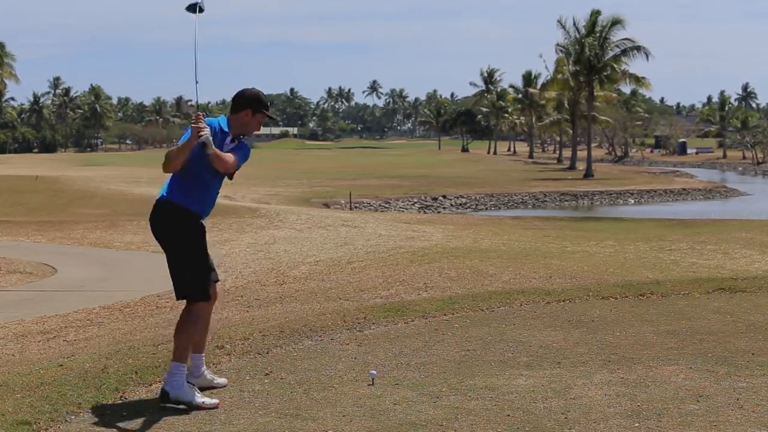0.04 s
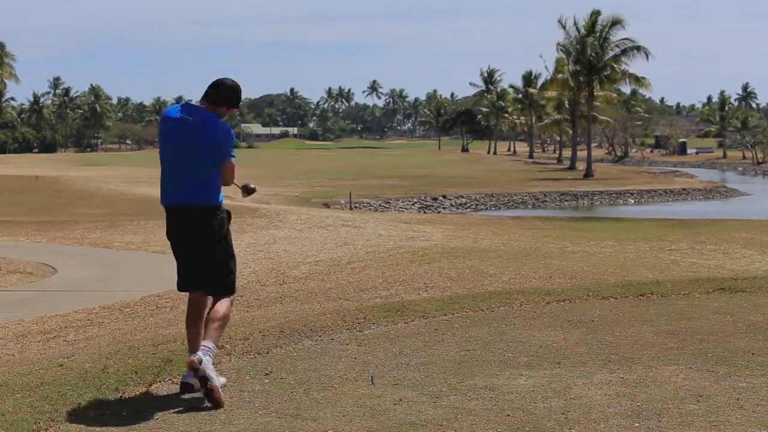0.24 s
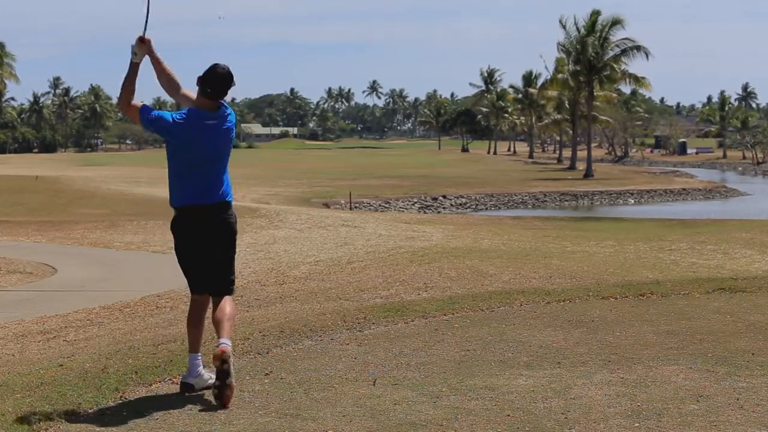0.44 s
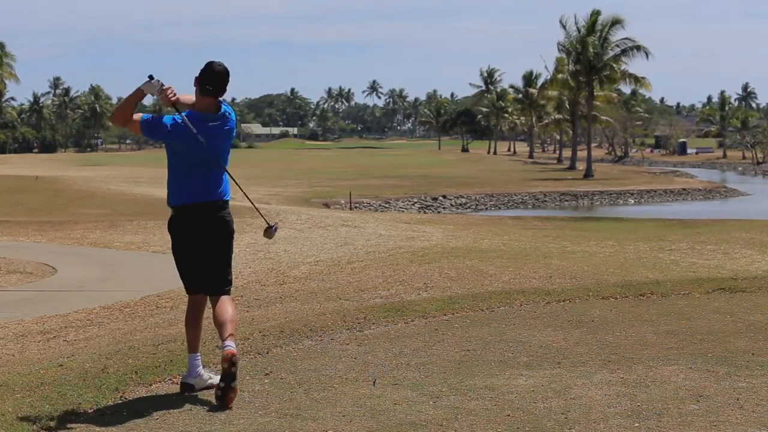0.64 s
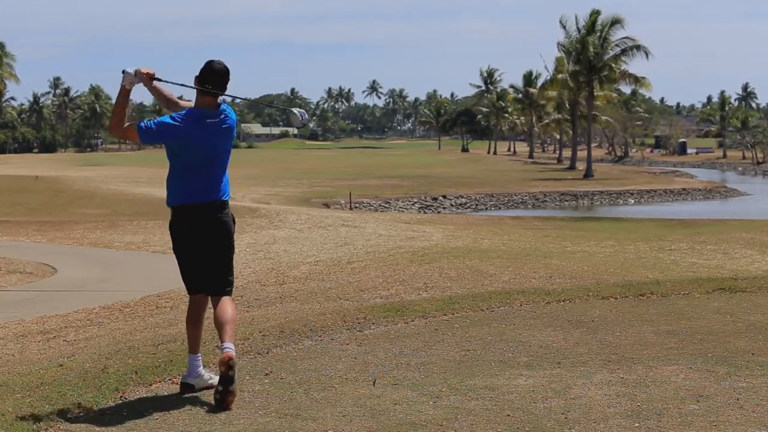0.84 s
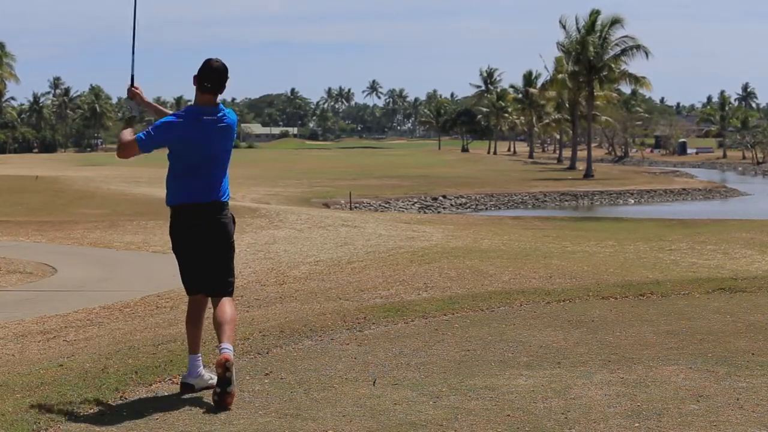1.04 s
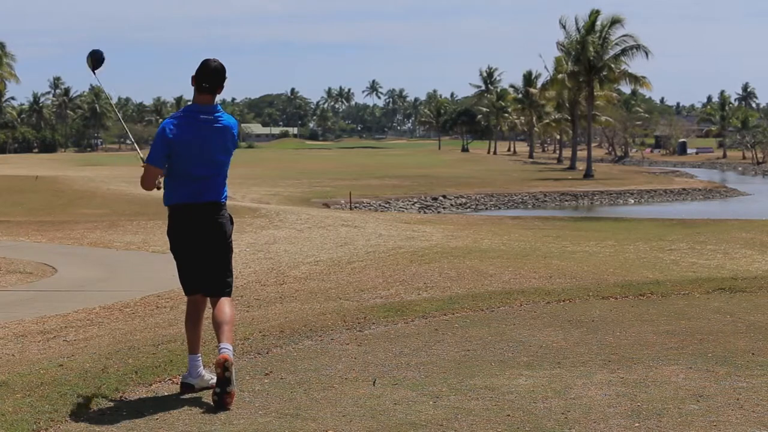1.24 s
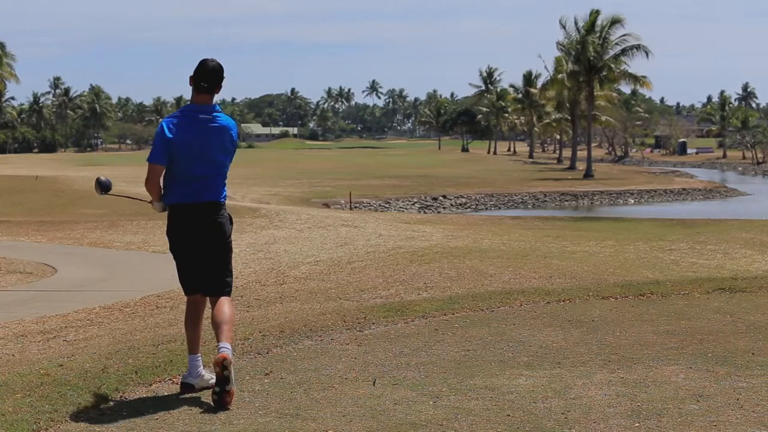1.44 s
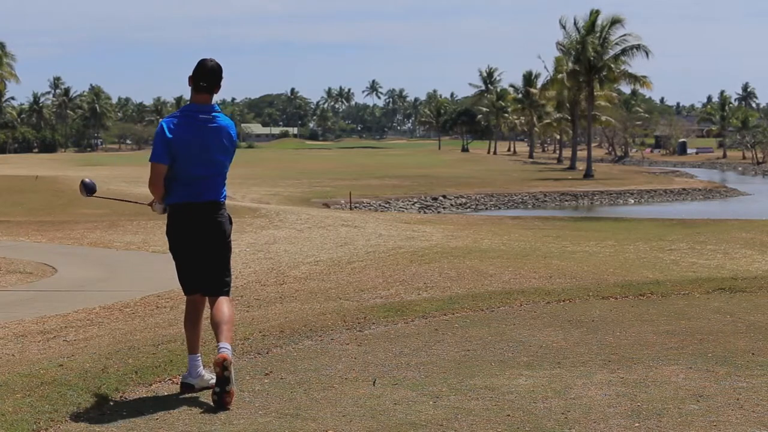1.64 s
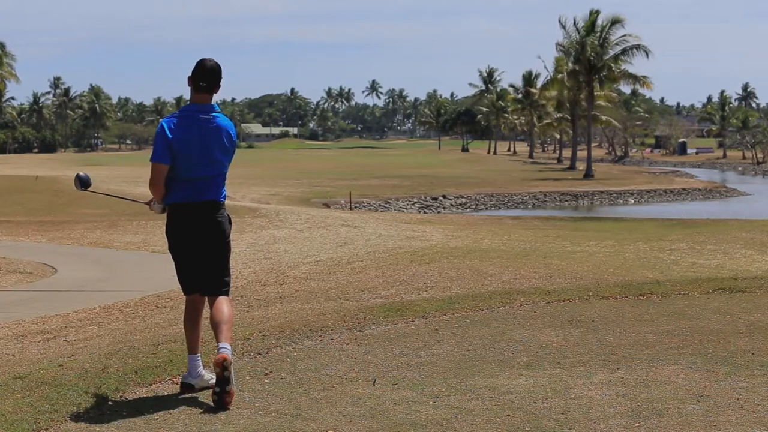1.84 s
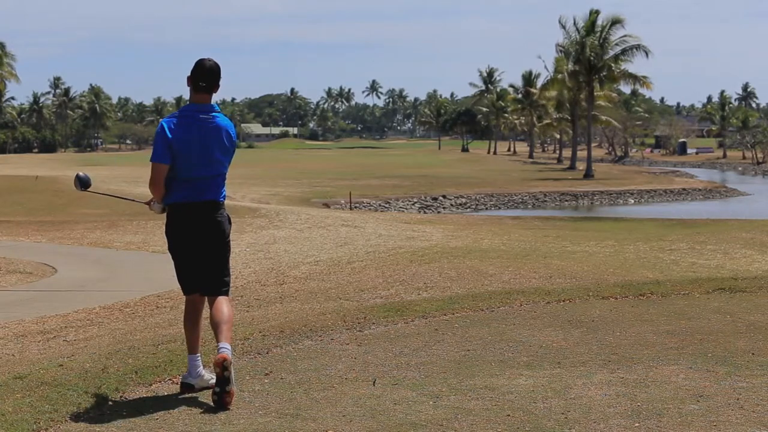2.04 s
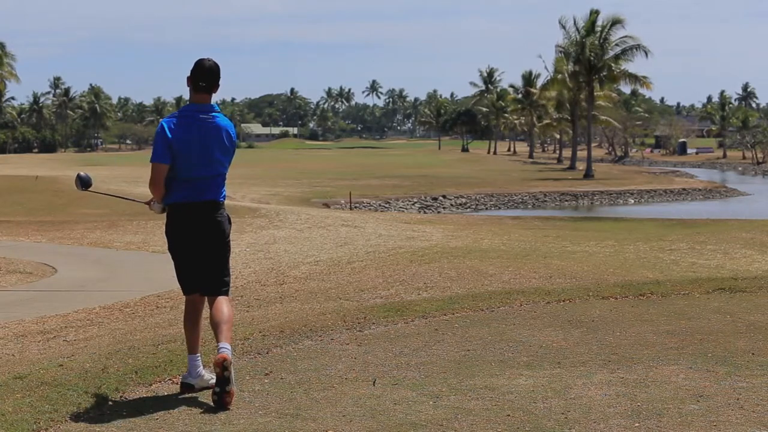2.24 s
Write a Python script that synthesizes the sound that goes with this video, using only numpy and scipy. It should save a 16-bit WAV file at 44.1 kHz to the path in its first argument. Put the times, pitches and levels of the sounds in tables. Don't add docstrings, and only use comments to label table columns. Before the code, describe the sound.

A golf driver hits a teed ball: a brief rising swish, a loud sharp metallic crack with a short high ring, faint scattered echo from trees, a fading hiss, then soft breeze, heard from a few metres away.

```python
import sys
import numpy as np
from scipy import signal
from scipy.fft import rfft, irfft, next_fast_len
from scipy.io import wavfile
from scipy.ndimage import uniform_filter1d, map_coordinates

SR = 44100
rng = np.random.default_rng(int(sys.argv[2]) if len(sys.argv) > 2 else 0)


def store_pcm(level_fs):
    pcm = np.round(np.clip(level_fs, -1, 1) * 32767).astype(np.int16)
    wavfile.write(sys.argv[1], SR, np.atleast_2d(pcm).T)


def nominal_scale(level):
    x = np.asarray(level, float) / 20
    return 10 ** x


N = 101429

HIT_S, HIT_DB = 0.2575, -16


def unit(x):
    return x / np.sqrt(np.mean(x ** 2) + 1e-20)


def clock():
    return np.arange(N) / SR


def since(start_s):
    return np.maximum(clock() - start_s, 0)


def curves(rows):
    s, *columns = np.transpose(rows)
    return [np.interp(clock(), s, column) for column in columns]


def wobble(rate_hz):
    points = rng.standard_normal(int(N * rate_hz / SR) + 4)
    return map_coordinates(points, [np.arange(N) * rate_hz / SR])


def rush(spectrum, patchy_db):
    _, _, z = signal.stft(rng.standard_normal(N + 512), SR, nperseg=512)
    patches = uniform_filter1d(rng.standard_normal(z.shape), 6, 0)
    patches = unit(uniform_filter1d(patches, 10, 1))
    noise = signal.istft(z * nominal_scale(patchy_db * patches), nperseg=512)[1][:N]
    hz, db = np.transpose(spectrum)
    m = next_fast_len(N)
    log_hz = np.log(np.fft.rfftfreq(m, 1 / SR) + 1)
    gain = nominal_scale(np.interp(log_hz, np.log(hz + 1), db, -120, -120))
    return unit(irfft(rfft(noise, m) * gain, m)[:N])


def fuzzy(hz, width_hz):
    phase = 2 * np.pi * np.cumsum(hz * np.ones(N)) / SR
    return unit(wobble(width_hz) * np.cos(phase) + wobble(width_hz) * np.sin(phase))


def course():
    # t/s, level/dB
    breeze = [(0, 2.5), (.5, 2), (1, 0.5), (1.5, -0.37), (2, -0.26), (2.3, -0.2)]
    # f/Hz, level/dB
    air_colour = [(180, -40), (300, -4.5), (316, -5.5), (497, -4), (571, -4.5), (914, -2.5), (2400, -14.5),
                  (3120, -53), (5280, -120)]
    hiss_colour = [(1350, -27), (2300, -2.5), (3300, -1), (3730, -3.5), (4070, -5), (5480, -12.5),
                   (14400, -26), (15700, -30)]
    rumble_colour = [(12, -36), (20, -14), (70, 1), (177, -5), (204, -8.5), (235, -4), (264, -10),
                     (330, -17), (430, -50), (730, -120)]
    # t/s, level/dB
    insect_path = [(0, -78), (.6, -69), (.7, -65.5), (.88, -70), (1.1, -75), (1.5, -78), (1.7, -73),
                   (1.9, -86), (2.3, -85)]
    db, = curves(breeze)
    air = nominal_scale(-57.5) * rush(air_colour, patchy_db=1.1) + nominal_scale(-64.5) * rush(hiss_colour, patchy_db=0.56)
    gusts = nominal_scale(db + 0.52 * wobble(2.97) + 0.77 * wobble(30.1))
    rumble = nominal_scale(-53 + 0.8 * db + 0.68 * wobble(6)) * rush(rumble_colour, patchy_db=1.3)
    insects = nominal_scale(curves(insect_path)[0]) * fuzzy(3180, width_hz=450)
    hum = nominal_scale(-66) * fuzzy(238, width_hz=25)
    return gusts * air + rumble + insects + hum


def swing():
    # t/s, f/Hz, level/dB
    shaft_path = [
        (.13, 380, -67),
        (.165, 520.6, -56.5),
        (.19, 618.6, -49.5),
        (.224, 560, -41.5),
        (.255, 601.6, -37.5),
        (.272, 498.6, -44),
        (.335, 449.7, -52.5),
        (.39, 351, -56.5),
        (.48, 250, -57),
    ]
    # t/s, f/Hz
    head_path = [(.17, 615), (.2, 774), (.225, 872.4), (.26, 856)]
    # f/Hz, level/dB
    swish_colour = [(760, -27), (1300, -5.5), (1620, -3), (2600, -3), (8230, -18.5), (15500, -37)]
    width_hz = 260
    swish_db, swish_growth = -4.5, 1.3
    hz, db = curves(shaft_path)
    alive = (clock() > shaft_path[0][0]) & (clock() < shaft_path[-1][0])
    shaft = fuzzy(hz, width_hz)
    head = nominal_scale(-0.5) * fuzzy(*curves(head_path), width_hz * 0.9) * (clock() < HIT_S + 0.004)
    hiss_db = db.max() + swish_db + swish_growth * (db - db.max())
    hiss = nominal_scale(hiss_db) * rush(swish_colour, patchy_db=-1.0) * (clock() < HIT_S + 0.01)
    return alive * nominal_scale(db) * (shaft + head) + hiss


def ringing(t, shift):
    # f/Hz, level/dB, time to fall 60 dB/s, rise/s
    modes = [(2985, -13.5, 0.16, 0.00021), (3744, -10, 0.098, 0.00024), (4060, -6.5, 0.1, 0.0052),
             (4324, -1, .09, .0012), (3197, 0, 0.0079, 0.00014), (5540, -15.5, 0.081, 0.0023),
             (6080, -11, .06, .003), (6420, -4.5, .075, 0.0041), (7100, -11.5, 0.074, .002),
             (7730, -14, .05, .002), (8160, -15, .07, .003), (8600, -16.5, .07, 0.0033),
             (9320, -12, 0.033, 0.00037), (10650, -20, 0.039, .001)]
    sag, sag_s, unrest_rad = 0.022, 0.01, 0.35
    bent = shift * (t - sag * (t - sag_s * (1 - np.exp(-t / sag_s))))
    ring = 0
    for hz, db, t60, rise in modes:
        envelope = nominal_scale(db - 60 * t / t60) * (1 - np.exp(-t / rise))
        phase = 2 * np.pi * hz * bent + unrest_rad * wobble(247)[:len(t)]
        ring = ring + envelope * np.sin(phase)
    return ring


def strike():
    # f/Hz, level/dB
    crack_colour = [(200, -30), (500, -6), (2300, 1), (5000, -10), (7500, -2.5), (10500, -10.5),
                    (12500, -10.5), (15700, -18)]
    # f/Hz, level/dB
    rattle_colour = [(3000, -35), (4500, -7), (7000, 2), (9500, -4), (11500, -18.5), (15700, -29)]
    contact_s, rise_s = 0.00074, 0.00017
    turf_s, turf_db = 0.0023, -2.5
    t = since(HIT_S)
    push = -nominal_scale(-16.5) * np.sin(np.pi * np.clip((t - 0.0003) / contact_s, 0, 1)) ** 2
    crack = nominal_scale(-23.5 - 60 * t / 0.019) * rush(crack_colour, patchy_db=0.5)
    rattle = nominal_scale(-29 - 60 * t / 0.13) * rush(rattle_colour, patchy_db=1.0)
    direct = nominal_scale(HIT_DB) * ringing(t, 0.99) + (crack + rattle) * (1 - np.exp(-t / rise_s))
    turf = nominal_scale(turf_db) * np.pad(0.34 * direct - 0.53 * push, (round(turf_s * SR), 0))[:N]
    return direct + push + turf


def thump():
    t = since(HIT_S)
    u = t / 0.012
    sway = np.sin(2 * np.pi * 38 * t + 1.1) * np.minimum(t / 0.004, 1)
    settling = np.exp(-u) * (1 + u + u * u / 2)
    ending = nominal_scale(-60 * np.maximum(t - 0.019, 0) / 0.03)
    return nominal_scale(-34) * sway * settling * ending


def ball():
    # t/s, level/dB
    flight = [
        (.27, -66),
        (.305, -62),
        (.33, -47),
        (.39, -51),
        (.43, -52.5),
        (.465, -54.5),
        (.53, -66.5),
        (.6, -66),
        (.75, -78.5),
    ]
    # f/Hz, level/dB
    ball_colour = [(1000, -14), (2900, -6), (4900, -9), (6500, -6), (9600, -10.5), (11000, -18.5),
                   (15700, -27)]
    db, = curves(flight)
    alive = (clock() > flight[0][0]) * nominal_scale(-40 * since(flight[-1][0]))
    return alive * nominal_scale(db + 0.7 * wobble(90)) * rush(ball_colour, patchy_db=1.5)


def trees():
    # pitch ratio, level/dB
    directions = [(.94, 0), (.98, -3), (1.025, -1)]
    echo_s, echo_db, echo_t60, echo_end_s = 0.066, -18.5, 0.87, 0.19
    toward = 1.065
    late = clock() - HIT_S - echo_s
    t = np.arange(SR // 20) / SR
    last_crown = 1 + np.exp(np.clip((echo_end_s - late) / 0.013, -50, 50))
    fade_db = -60 * np.abs(late) / echo_t60 - 12 / last_crown
    echo = 0
    for shift, db in directions:
        crowns = rng.standard_normal(N) * nominal_scale(6.2 * wobble(69.9) + fade_db) * (late > 0)
        crowns = crowns / np.linalg.norm(crowns)
        short_ring = ringing(t, shift * toward) * nominal_scale(-60 * t / 0.1)
        echo = echo + nominal_scale(db) * signal.fftconvolve(crowns, short_ring)[:N]
    leaves = signal.butter(2, [3700, 4800], "band", fs=SR, output="sos")
    return nominal_scale(HIT_DB + echo_db) * signal.sosfilt(leaves, echo)


def shoe():
    # f/Hz, level/dB
    shoe_colour = [(60, -22), (120, 0), (300, 2), (500, -14), (1500, -23), (2200, -31)]
    t = since(0.432)
    return nominal_scale(-47.5 - 60 * t / 0.11) * (1 - np.exp(-t / 0.004)) * rush(shoe_colour, patchy_db=3.0)


def scene():
    return (course() + swing() + strike() + ball() + trees() + shoe())[None]


def low_pass(x):
    return signal.sosfilt(signal.butter(12, 16450, fs=SR, output="sos"), x)


def record(dry):
    duck_s, duck_db, fall_s, back_s = 0.2702, -8, 0.0006, 0.033
    top_hz, ceiling = 15850, 0.3
    t = clock() - duck_s
    recovery = np.exp(-(np.maximum(t, 0) / back_s) ** 2)
    duck = recovery / (1 + np.exp(np.clip(-t / fall_s, -50, 50)))
    held = dry * nominal_scale(duck_db * duck) + thump()
    m = next_fast_len(N)
    below_top = np.fft.rfftfreq(m, 1 / SR) < top_hz
    held = irfft(rfft(held, m) * below_top, m)[:, :N]
    held = held / (1 + np.abs(held / ceiling) ** 4) ** 0.25
    return low_pass(held)


dry = scene()
out = record(dry)
store_pcm(out)
```